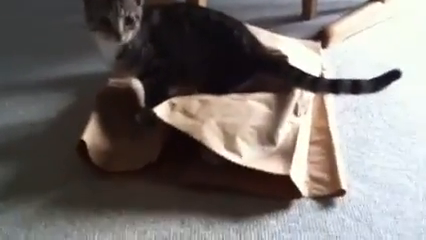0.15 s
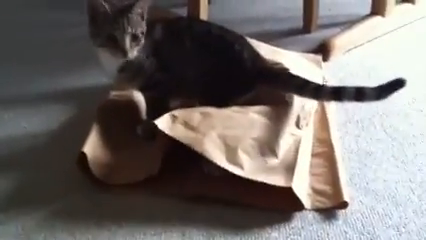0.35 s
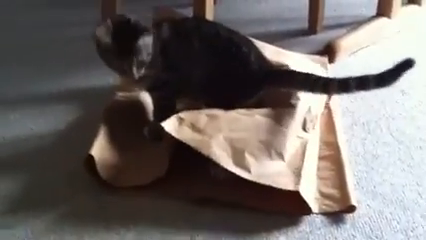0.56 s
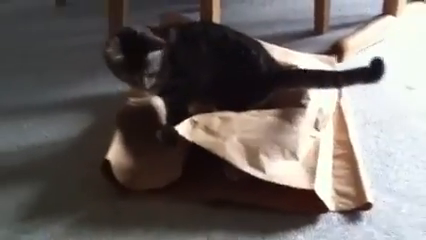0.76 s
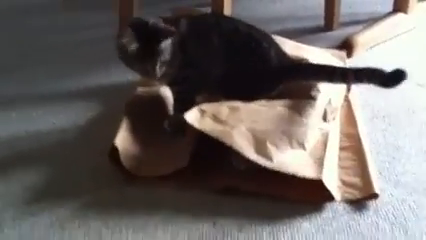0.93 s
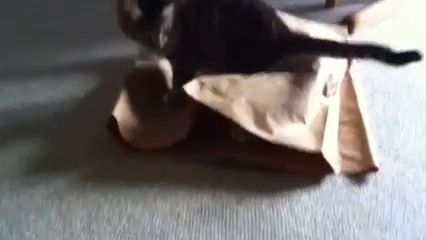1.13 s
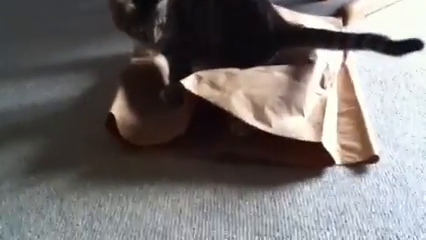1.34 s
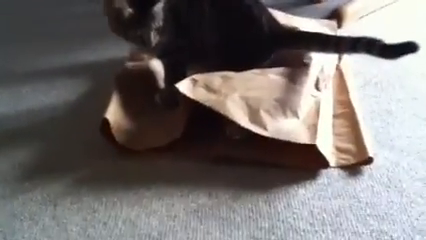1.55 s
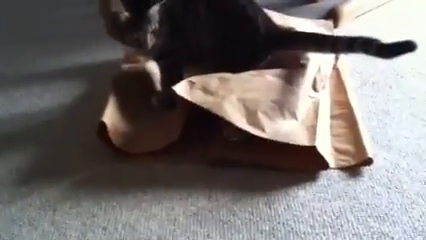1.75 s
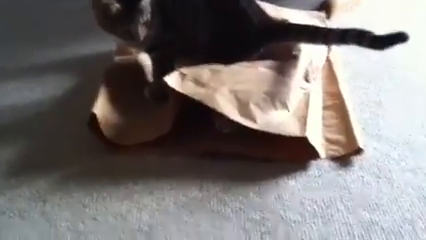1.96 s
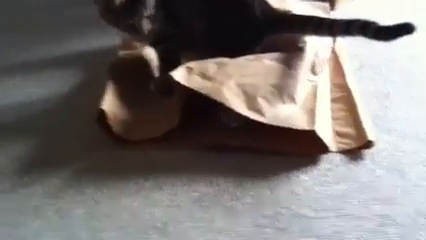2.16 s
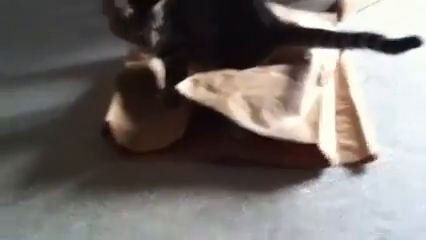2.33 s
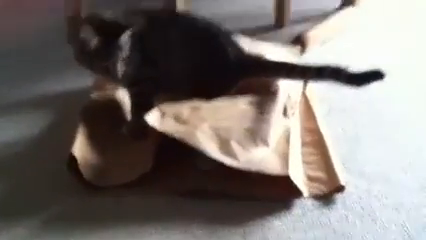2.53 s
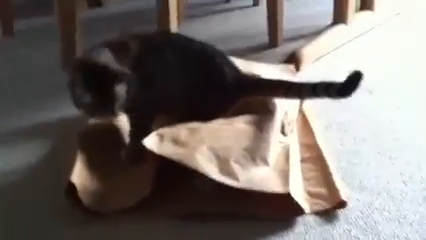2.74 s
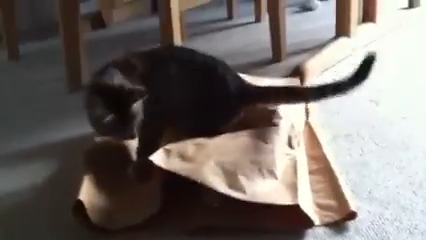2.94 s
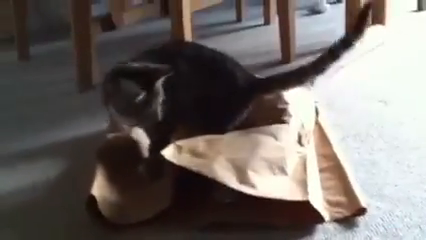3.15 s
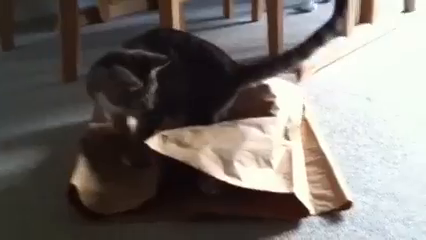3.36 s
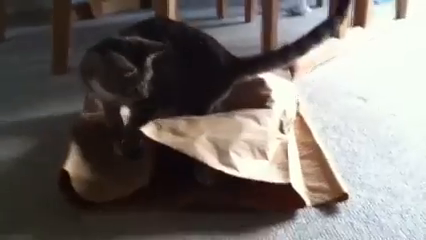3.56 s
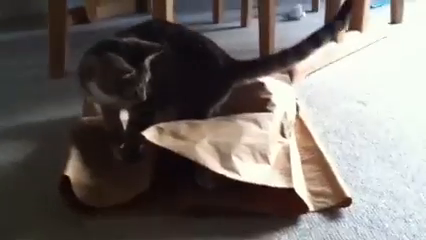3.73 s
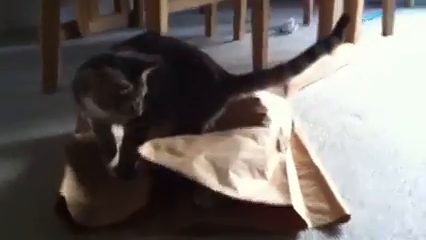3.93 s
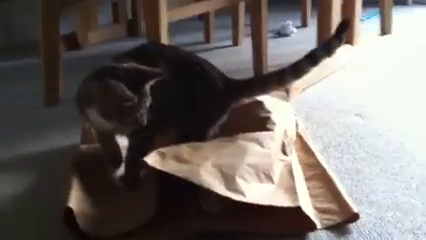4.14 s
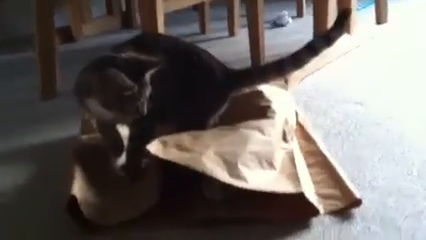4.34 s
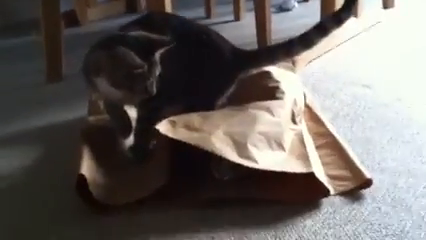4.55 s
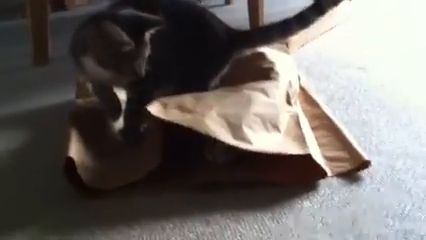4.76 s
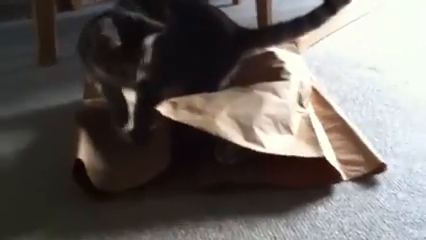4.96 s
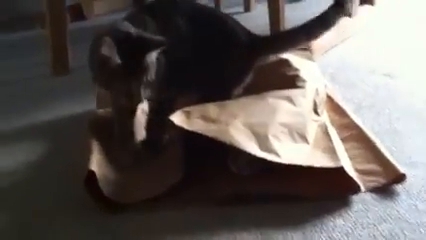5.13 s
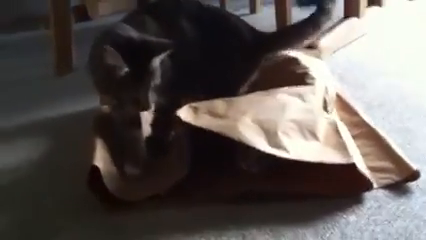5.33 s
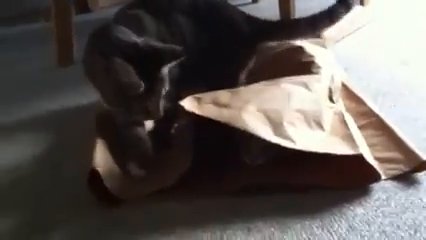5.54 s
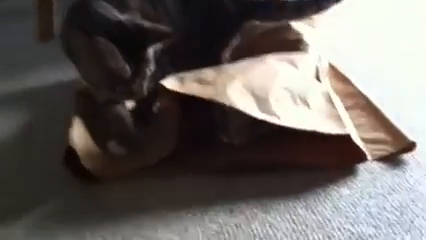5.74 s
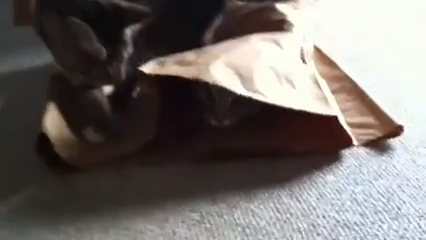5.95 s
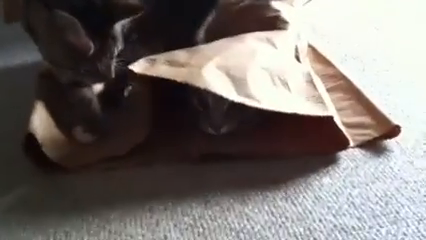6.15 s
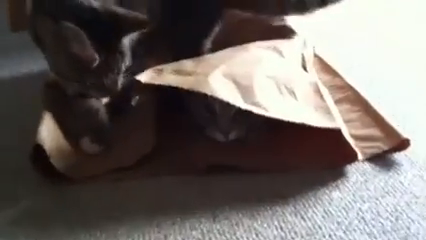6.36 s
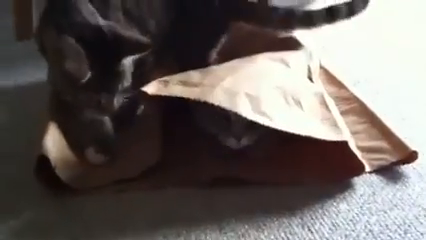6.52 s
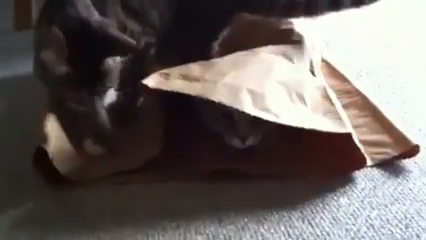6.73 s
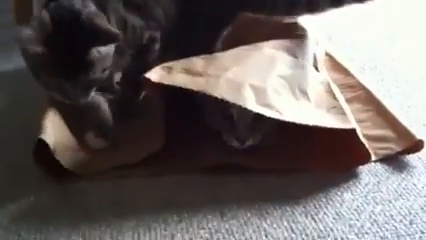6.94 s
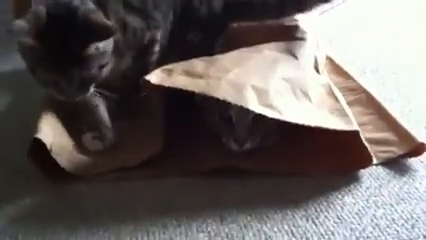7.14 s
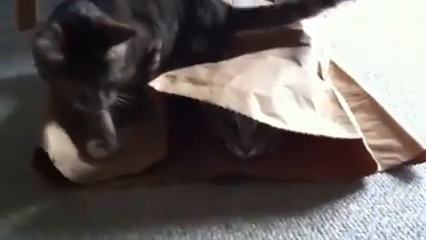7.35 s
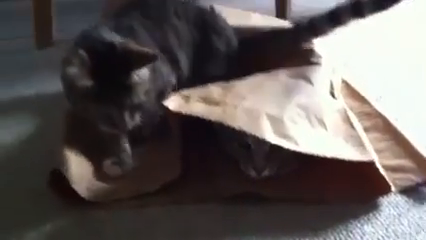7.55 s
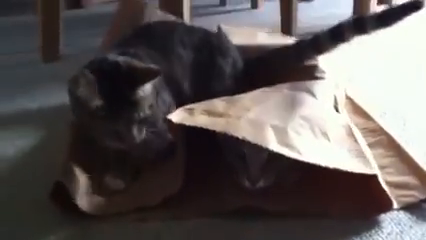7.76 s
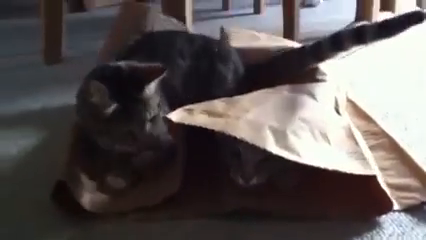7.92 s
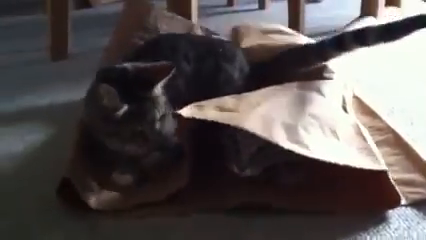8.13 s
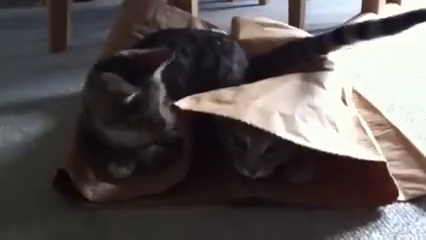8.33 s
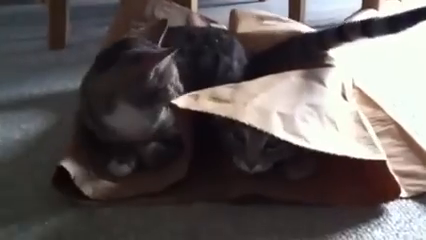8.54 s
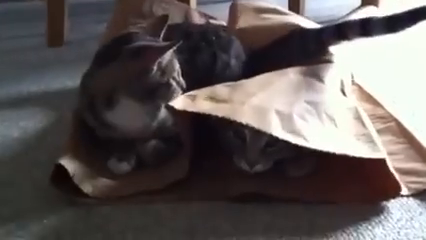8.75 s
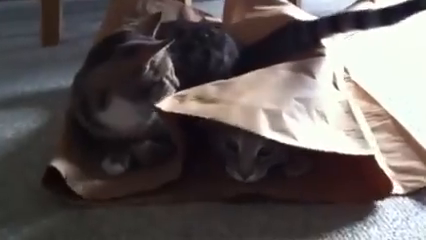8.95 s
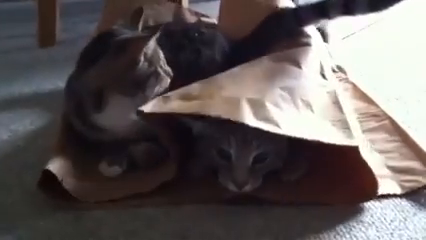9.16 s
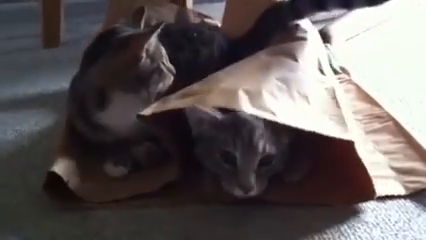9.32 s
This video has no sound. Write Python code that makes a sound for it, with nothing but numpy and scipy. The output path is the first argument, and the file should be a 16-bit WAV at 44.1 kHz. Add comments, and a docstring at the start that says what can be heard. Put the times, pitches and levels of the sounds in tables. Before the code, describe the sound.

Quiet room hiss, a few soft paw steps, isolated paper snaps, then heavy hollow crinkling and popping as two cats scuffle in a paper bag.

```python
"""Paper crackles and booms: two cats scuffle in and on a big paper bag on a carpet, first a few paw steps,
then heavy crumpling. Creases snap as spiky noise bursts, panels pop as damped sines and flaps of noise,
and countless tiny folds rustle between them as short ticks. Paws and bodies bump the bag like a dull drum.
The air in the bag colours the paper with resonances; a small furnished room answers with an echo and
a decaying noise tail. Steady filtered noise makes the room air and microphone hiss."""
import sys
import numpy as np
from scipy import signal
from scipy.fft import rfft, irfft, next_fast_len
from scipy.io import wavfile

SR = 44100
rng = np.random.default_rng(int(sys.argv[2]) if len(sys.argv) > 2 else 0)


def log_audio(samples):
    """Write samples as a 16-bit WAV file to the path given in sys.argv[1]."""
    # one column per channel
    frames = np.atleast_2d(samples).T
    # limit to full scale, then quantise
    limited = np.clip(frames, -1, 1)
    pcm = np.round(limited * 32767).astype(np.int16)
    wavfile.write(sys.argv[1], SR, pcm)


N = 414099  # length in samples


def amp(db):
    """Decibels to gain."""
    return 10 ** (np.asarray(db) / 20)


def unit(x):
    """x at rms 1."""
    return x / np.sqrt(np.mean(x ** 2) + 1e-20)


def along(points, hz):
    """Curve of (f/Hz, value) points, read on a log frequency axis."""
    f, v = np.transpose(points)
    return np.interp(np.log(hz + 1), np.log(f + 1), v)


def filtered(x, response):
    """x times a complex response of frequency."""
    m = next_fast_len(N + SR // 2)
    spectrum = rfft(x, m) * response(np.fft.rfftfreq(m, 1 / SR))
    return irfft(spectrum, m)[:N]


def band(x, lo_hz, hi_hz, order=2):
    """Causal band-pass."""
    edges = [lo_hz, min(hi_hz, SR / 2 - 1000)]
    return signal.lfilter(*signal.butter(order, edges, "band", fs=SR), x)


def add(track, s, x):
    """Mix x into the track at time s in seconds."""
    i = max(round(s * SR), 0)
    track[i:i + len(x)] += x[:max(len(track) - i, 0)]


def hiss(level_db=-66):
    """Room air and microphone hiss: steady noise shaped in frequency."""
    # hiss spectrum: (f/Hz, relative density/dB)
    hiss_curve = [(25, -7), (60, -28), (100, -9), (170, -0.5), (220, -1), (330, -5), (500, -5.5),
                  (800, -9.5), (1400, -11.5), (3000, -14), (6000, -15), (8500, -17), (12000, -16.5),
                  (15800, -18)]
    noise = filtered(rng.standard_normal(N), lambda hz: amp(along(hiss_curve, hz)))
    return amp(level_db) * unit(noise)


def room(x, ceiling_s=0.016, ceiling_db=-11, build_s=0.00079):
    """The room's answer to x: a ceiling echo and a noise tail, drawn anew at each call."""
    # how long the furnished room rings: (f/Hz, t60/s)
    decay = [(150, 1.42), (400, 0.2), (1000, 0.354), (2800, 0.2533), (7300, 0.26), (15000, 0.23)]
    # tone of the tail: (f/Hz, relative level/dB)
    colour = [(100, -4), (500, 2.5), (2500, 1), (7000, 2.5), (15000, 2)]
    hz, t, z = signal.stft(rng.standard_normal(SR // 3), SR, nperseg=256)
    gain = amp(along(colour, hz)[:, None] - 60 * t / along(decay, hz)[:, None])
    tail = signal.istft(z * gain, SR, nperseg=256)[1]
    tail = tail * (1 - np.exp(-np.arange(len(tail)) / SR / build_s))
    tail = tail / np.linalg.norm(tail)
    tail[round(ceiling_s * SR)] += amp(ceiling_db)
    return signal.fftconvolve(x, tail)


def bumps():
    """A padded blow on the taut bag sets its low modes going: a dull, short drum note of damped sines."""
    # soft bumps of paws and bodies: (t/s, level/dB, brightness/dB per octave above the lowest mode)
    blows = [(0.655, -57, 4), (0.692, -60, 4), (0.735, -67, 3), (2.3061, -61, 11), (2.323, -46, 3),
             (2.6204, -56.5, -2), (3.489, -57, 0), (5.555, -45, -1), (8.472, -46, -1)]
    # low modes of the bag, before the band-pass: (f/Hz, relative level/dB, t60/s)
    modes = [(180.6, 2.5, 0.094), (394, -0.5, 0.023), (890, -13, 0.026), (1400, -27, 0.034),
             (2180, -38, 0.036)]
    out, t = np.zeros(N), np.arange(SR // 4) / SR
    for s, db, tilt_db in blows:
        note = np.zeros(len(t))
        for hz, level, t60 in modes:
            mode_db = db + level + tilt_db * np.log2(hz / modes[0][0])
            note += amp(mode_db - 60 * t / t60) * np.sin(2 * np.pi * hz * t)
        note = band(note, 135, 3000)  # the bag is too small to radiate deep bass
        add(out, s, note)
        add(out, s, amp(-10) * room(note))
    return out


def hollow(x, db):
    """The air in the bag rings along with the paper: a sum of resonances beside the direct sound."""
    # air resonances in the open bag: (f/Hz, width/Hz, level over the direct sound/dB)
    resonances = [(183, 23, 1), (343, 44, -4.5), (572, 27, -8), (748, 37, -6), (1350, 1500, -13),
                  (3700, 190, -18), (11500, 800, -17)]

    def response(f):
        """Direct sound plus one second-order band-pass for each resonance."""
        ring = sum(amp(level) * 1j * f * w / (hz * hz - f * f + 1j * f * w) for hz, w, level in resonances)
        return 1 + ring
    return amp(db) * filtered(x, response)


def load(attack_s=0.0098):
    """Gains of flexing, crinkle and fizz: each push rises quickly, holds, and lets the paper settle."""
    # a paw or body pushes the paper, levels ahead of the rustle mix:
    # (start t/s, length/s, crinkle level/dB, brightness = fizz over crinkle/dB, flexing panels level/dB)
    pushes = [(0.64, 0.067, -76, -4, -71), (0.7, 0.05, -69, -6, -69.5), (1.355, 0.1, -84, -12, -74),
              (2.33, 0.7, -78, -16, -75), (2.97, 0.45, -75, -8, -72), (3.41, 0.044, -68, 3, -68),
              (3.486, 0.13, -64, -5, -65.5), (3.66, 0.29, -75.5, -14, -73), (5.464, .02, -68, 7, -67.5),
              (5.48, 0.046, -51, -6, -54), (5.52, 0.013, -43, 4, -43), (5.715, .1, -57.5, -12.5, -56),
              (5.844, 0.28, -70.5, 2.5, -69), (6.064, 0.26, -64.5, -1.5, -61.5),
              (6.291, 0.022, -61, 3, -54.5), (6.326, 0.021, -51.5, -2, -57),
              (6.634, 0.03, -62.5, -9, -56.5), (6.93, 0.05, -60, -12, -55.5), (6.984, 0.042, -56, 4.5, -62),
              (7.112, 0.033, -57, -4, -58), (7.187, 0.055, -55.5, -5.5, -59),
              (7.279, 0.14, -65.5, -18, -61.5), (7.552, 0.079, -49, 3.5, -51),
              (7.658, 0.16, -54.5, -6, -53.5), (7.776, 0.027, -50, 1, -52), (7.863, 0.12, -57.5, -2, -59),
              (7.974, 0.024, -45.5, 2.5, -50), (8.079, 0.029, -44, 5.5, -48), (8.133, .1, -53.5, 3, -55),
              (8.239, 0.025, -51.5, 9, -59), (8.321, 0.092, -55, -12, -56.5), (8.388, 0.12, -51, -5, -53.5),
              (8.546, 0.078, -53, -2.5, -53.5), (8.685, .13, -60, -2, -61), (8.86, 0.13, -71.5, 0, -68.5),
              (8.99, .035, -51.5, -9, -51), (9.052, 0.14, -55.5, -6, -57), (9.165, 0.1, -53.5, -4, -57),
              (9.273, 0.077, -49, 1, -50.5)]
    # settling after a push, the smallest folds first: flexing, crinkle, fizz (fall/dB per s)
    release = [195, 227, 361]
    t = np.arange(0, N / SR, .001)  # 1 ms control steps
    power = np.zeros((3, len(t)))
    for s, length, crinkle_db, bright_db, flex_db in pushes:
        levels = np.array([[flex_db], [crinkle_db], [crinkle_db + bright_db]])
        settled = np.outer(release, np.maximum(t - s - length, 0))
        attack = np.clip((t - s) / attack_s, 0, 1)
        power += (attack * amp(levels - settled)) ** 2
    return np.array([np.interp(np.arange(N) / SR, t, np.sqrt(p + 1e-12)) for p in power])


def folds(per_s, hz, octaves, cycles, spread_db=5):
    """Tiny folds buckle at random moments, each a damped tick of its own size and pitch."""
    chance = rng.standard_normal((int(per_s * N / SR), 2))
    start = rng.integers(N, size=len(chance))
    pitch = np.minimum(hz * 2 ** (octaves * chance[:, :1]), SR / 2 - 4000)
    k = np.arange(int(5 * cycles * SR / hz))
    turns = pitch * k / SR
    size = amp(spread_db * np.minimum(chance[:, 1:], 2)) * np.sqrt(pitch / hz)
    ticks = size * np.sin(2 * np.pi * turns) * turns * np.exp(-2 * turns / cycles)
    positions = start[:, None] + k
    return unit(np.bincount(positions.ravel(), ticks.ravel(), N)[:N])


def rustle(gains, direct_db=-2, room_db=-5, puff_db=-23):
    """Folds of three sizes crinkle as the cats push, while fur and paper rub in the same range."""
    # flexing panels, crinkle, fizz:
    # (folds/s, middle f/Hz, pitch spread/octaves, life/cycles, rubbing noise level/dB)
    fold_sizes = [(252, 560, 0.63, 1.29, -6), (688, 2180, 0.79, 0.83, -7), (2630, 8600, 0.28, 0.61, -2.5)]
    dry, wet = np.zeros(N), np.zeros(N)
    for gain, (per_s, hz, octaves, cycles, rub_db) in zip(gains, fold_sizes):
        rub = unit(band(rng.standard_normal(N), hz / 2, hz * 2))
        ticks = band(folds(per_s, hz, octaves, cycles), hz / 4, hz * 4)
        dry += gain * unit(ticks + amp(rub_db) * rub)
    for i in range(0, N, SR // 3):  # a new room tail for every third of a second
        add(wet, i / SR, room(dry[i:i + SR // 3]))
    puff = gains[0] * unit(band(rng.standard_normal(N), 27, 51))  # flexing panels pump air out of the bag
    return amp(direct_db) * dry + amp(room_db) * wet + amp(puff_db) * puff


def lesser_snaps(gains, quiet_db=-80, count=600):
    """Creases give way at random under load, following the strength and brightness of the push."""
    per_s = 20  # chances of a snap per second
    crack_over_crinkle_db, pop_over_flex_db, scatter_db = -1, -2, 2.5
    panel_hz, panel_octaves = 640, 0.32  # middle pitch of the pops and its spread
    times = np.cumsum(rng.exponential(size=count)) / per_s
    chance = np.clip(rng.standard_normal((count, 2)), -2, 2)
    rows = []
    for s, (size, pitch) in zip(times[times < (N - 1) / SR], chance):
        flex_db, crinkle_db, fizz_db = 20 * np.log10(gains[:, int(s * SR)])
        if crinkle_db > quiet_db:
            extra_db = scatter_db * size
            crack_db = crinkle_db + crack_over_crinkle_db + extra_db
            pop_db = flex_db + pop_over_flex_db + extra_db
            rows.append((s, crack_db, fizz_db - crinkle_db, pop_db, panel_hz * 2 ** (panel_octaves * pitch)))
    return rows


def crack(t, rise_s, t60, flutter_db, flutter_t60, spiky_db, click_db):
    """A crease starts to give, lets go with a click and spiky burst at t = 0, and the sheet flutters briefly."""
    spikes = rng.standard_normal(len(t)) * amp(spiky_db * rng.standard_normal(len(t)))
    spikes[np.argmin(np.abs(t))] = amp(click_db)
    late = np.maximum(t, 0)
    rise = np.exp(np.minimum(t, 0) / rise_s)
    fall = amp(-60 * late / t60) + amp(flutter_db - 60 * late / flutter_t60)
    return spikes * rise * fall


def snaps(rows, buried=0.29):
    """Each crease cracks at its own pitch, and the panel beside it pops through with a few damped swings."""
    # a crease that faces outwards sounds brighter, higher and drier than one buried in the bag
    flat_crease_hz, octaves_per_db = 2720, .03  # pitch at brightness 0, and its rise
    thrown_db, drier_per_db = -4, 0.2256  # share thrown into the room at brightness 0, and its fall
    out, t = np.zeros(N), np.arange(-(SR // 250), SR // 25) / SR
    late = np.maximum(t, 0)

    def strike(x):
        """x scaled by its energy up to t = 5 ms, taken as an rms of 1 over 5 ms."""
        return x / np.sqrt(np.sum(x[t < 1 / 200] ** 2) * 200 / SR)

    for s, crack_db, bright_db, pop_db, panel_hz in rows:
        crease_hz = flat_crease_hz * 2 ** (octaves_per_db * np.clip(bright_db, -20, 20))
        room_db = thrown_db - drier_per_db * bright_db
        # the panel swings at its pitch and flaps as noise
        swing = np.sin(2 * np.pi * panel_hz * late) * amp(-60 * late / 0.012) * rng.choice([-1, 1])
        swing = strike(band(swing, 158, 1700, order=1))
        flap = band(rng.standard_normal(len(t)) * (t > 0), 293, 990) * amp(-60 * late / 0.028)
        pop = amp(pop_db) * strike(swing + amp(-5.5) * strike(flap))
        # a crease buried in the bag shakes more paper than one that faces outwards
        shaken_db = buried * room_db
        burst = crack(t, rise_s=0.0007, t60=0.014, flutter_db=shaken_db - 3.5, flutter_t60=0.021,
                      spiky_db=1.3, click_db=15)
        burst = band(burst, crease_hz / 2.3, crease_hz * 1.78, order=1)
        mid = amp(crack_db) * strike(band(burst, 1070, 8000))
        burst = crack(t, rise_s=0.00067, t60=0.011, flutter_db=shaken_db + 0.5, flutter_t60=0.041,
                      spiky_db=2.0, click_db=12.5)
        top = amp(crack_db + bright_db) * strike(band(burst, 6540, 14800))
        add(out, s + t[0], pop + mid + top)
        to_room = amp(shaken_db - 4.5) * pop + amp(room_db) * (mid + amp(-7.5) * top)
        add(out, s + t[0], room(to_room))
    return out


def scene():
    """The bag in its room, one channel."""
    # creases that buckle at known moments, from faint ticks to sharp cracks, ahead of the hollow of the bag:
    # (t/s, crack level/dB, brightness = fizz over crack/dB, panel pop level/dB, panel f/Hz)
    placed_snaps = [(0.7147, -60.5, -16, -66, 500), (1.5985, -80, -5, -64.5, 700),
                    (2.6211, -54.5, -7, -49, 403), (2.9817, -53, -5, -56.5, 430),
                    (3.1157, -43.5, -13, -47.5, 512), (3.129, -52.5, -10, -54, 600),
                    (3.2039, -71, -8, -55, 570), (3.3036, -57, -15, -59.5, 580),
                    (3.4176, -52, -6, -56, 510), (3.4885, -44, -4.5, -39, 590), (3.568, -52, -9, -57, 740),
                    (3.902, -59, -6, -65, 730), (5.4849, -41.5, -5.5, -57, 710),
                    (5.5436, -33.5, 8, -41, 710), (5.5701, -53, -2, -41, 527), (5.5942, -45, -16, -55, 560),
                    (5.6683, -54.5, -8, -70, 400), (5.7166, -41, -14, -40, 560),
                    (5.7269, -45, -19, -47, 686), (5.8038, -48.5, -1.5, -62, 645),
                    (5.8251, -49.5, -10, -62, 720), (5.8728, -56.5, -5, -58, 650),
                    (5.9534, -66, -3, -56, 730), (5.9708, -70, -11, -53, 684), (6.0308, -60, -4, -59, 620),
                    (6.0748, -53.5, -1, -57.5, 590), (6.1107, -47, 11, -53, 724),
                    (6.1889, -53, -9, -50.5, 730), (6.227, -52, -25, -65, 640),
                    (6.3255, -40, 2, -48.5, 500), (6.5664, -47, -12.5, -49.5, 634),
                    (6.6403, -43, -12, -45.5, 780), (6.6515, -48.5, -12, -49, 680),
                    (6.8288, -64.5, -4, -67, 573), (6.9353, -57, -13, -44, 560),
                    (6.9507, -52, -23, -41.5, 804), (6.97, -46, -3, -52, 552),
                    (6.9969, -36.5, -2, -38, 870), (7.009, -41.5, -6, -46, 740),
                    (7.1245, -48, -5, -65, 448), (7.2021, -49.5, -6, -42, 610),
                    (7.2506, -51, -17, -44.5, 424), (7.299, -59, -4, -35, 640), (7.362, -53, -18, -51, 770),
                    (7.3904, -77, -12, -46, 850), (7.5232, -44.5, -9, -51, 498),
                    (7.556, -45.5, 7, -46.5, 495), (7.589, -37, 5, -55, 810),
                    (7.6159, -42, -25, -39.5, 802), (7.6263, -44, 5, -38, 614), (7.6396, -45, 0, -42, 570),
                    (7.6818, -48, -13, -46, 620), (7.7214, -51, -13.5, -39.5, 674),
                    (7.7316, -48, -2.5, -49, 718), (7.779, -39.5, -19, -42.5, 444),
                    (7.7876, -39.5, -5, -43.5, 735), (7.9113, -57, -4, -49, 450),
                    (7.9682, -42.5, -15, -39, 801), (7.9902, -36.5, -13, -43, 714),
                    (8.0002, -41, -12, -60, 710), (8.088, -37.5, -5, -37.5, 450),
                    (8.1914, -36.5, 10.5, -42, 551), (8.2032, -39, -5, -47, 630),
                    (8.2456, -40.5, 1.5, -49, 550), (8.3793, -47, -3, -46.5, 694),
                    (8.4176, -40, -6.5, -58, 533), (8.4302, -51, 3, -42.5, 875),
                    (8.4723, -43, -1.5, -38, 555), (8.5075, -48.5, -1, -58.5, 740),
                    (8.563, -48, -6, -46, 501), (8.6016, -44.5, -1.5, -46, 576),
                    (8.6248, -51, -21, -49.5, 684), (8.7022, -51.5, 1, -41, 958),
                    (8.8878, -69.5, -8, -53.5, 660), (8.9993, -45, -3.5, -51.5, 771),
                    (9.0127, -42.5, -6, -45, 700), (9.109, -65, -14, -46.5, 780),
                    (9.131, -42.5, -14, -62, 710), (9.163, -41.5, -9, -40.5, 640),
                    (9.183, -48, -1, -45.5, 675), (9.2632, -44, -10, -59, 660),
                    (9.2816, -36, 2.5, -38, 770), (9.354, -42, -3, -48, 676), (9.3735, -56, -4, -45, 592)]
    gains = load()
    background = hiss() + bumps()
    paper = snaps(placed_snaps) + rustle(gains) + snaps(lesser_snaps(gains))
    return (hollow(paper, db=-1.5) + background)[None]


def record(dry, low_hz=90, top_hz=16200):
    """A small microphone thins the bass and keeps nothing above its band limit."""
    thin = signal.lfilter(*signal.butter(1, low_hz, "high", fs=SR), dry[0])
    return filtered(thin, lambda hz: hz < top_hz)[None]


dry = scene()
out = record(dry)
log_audio(out)
```